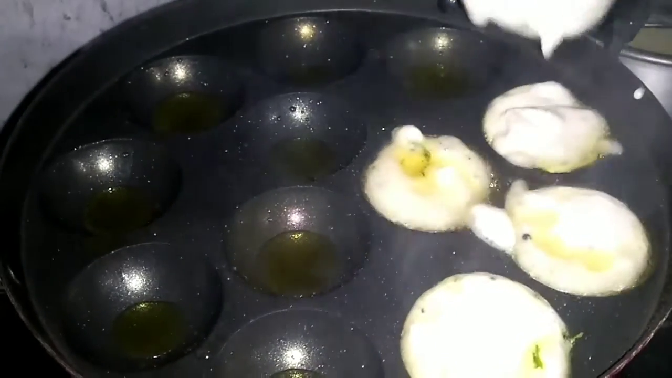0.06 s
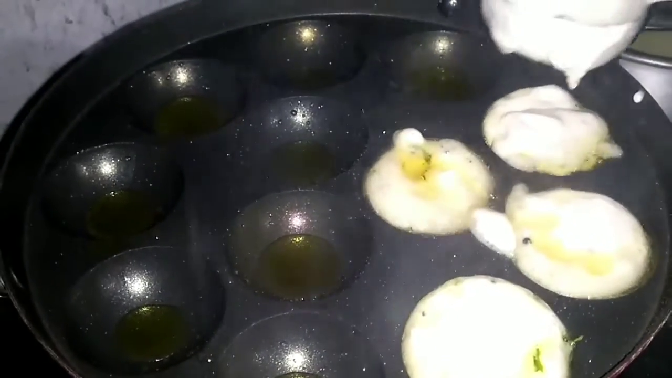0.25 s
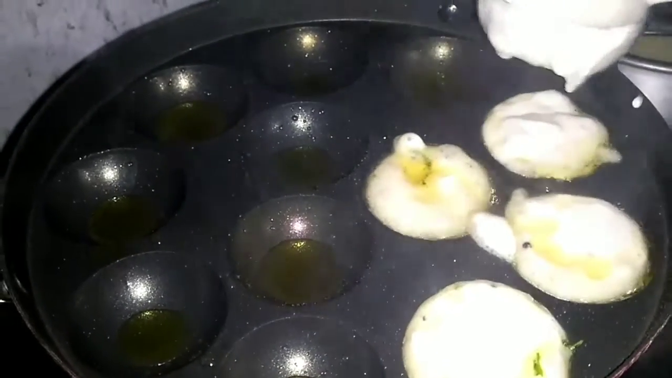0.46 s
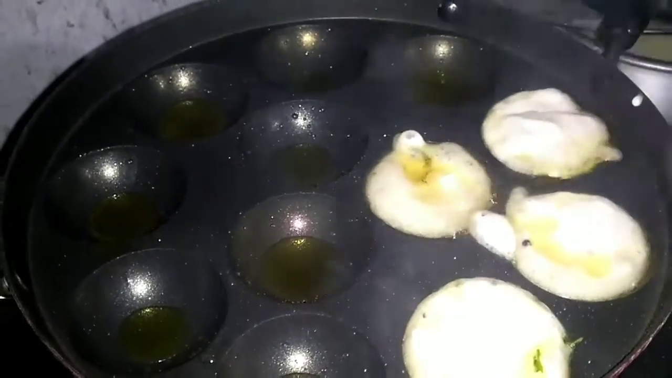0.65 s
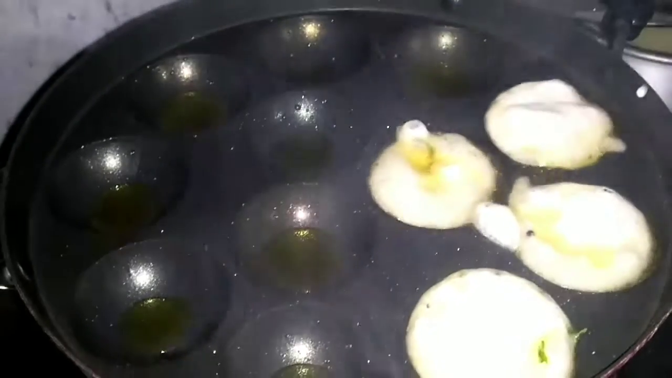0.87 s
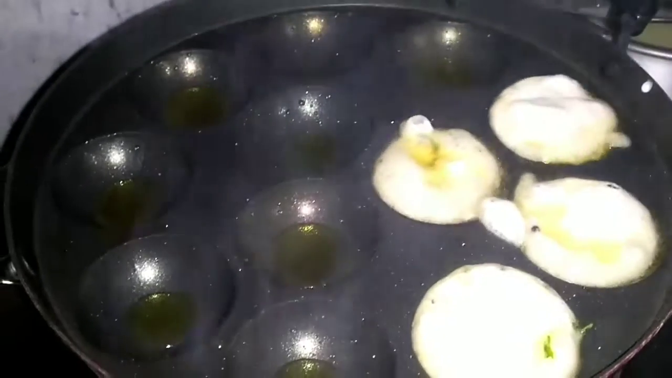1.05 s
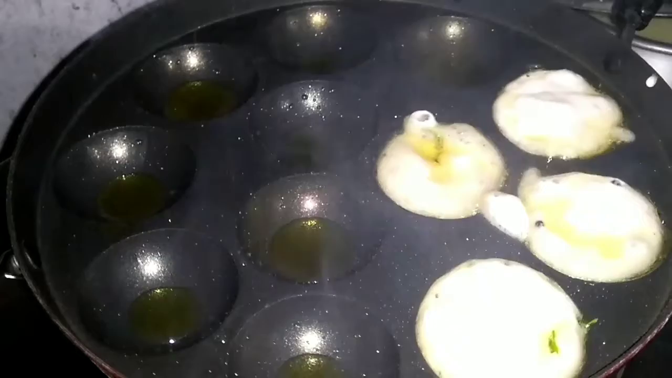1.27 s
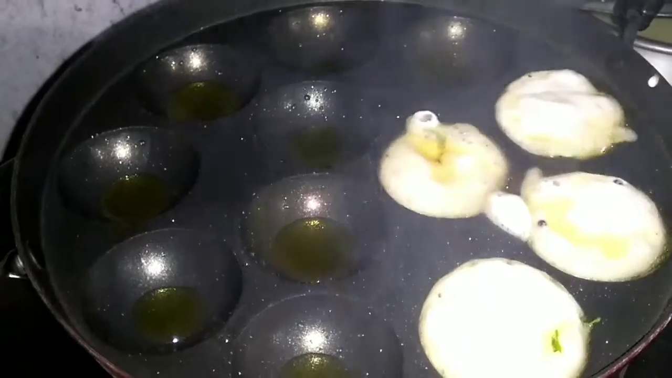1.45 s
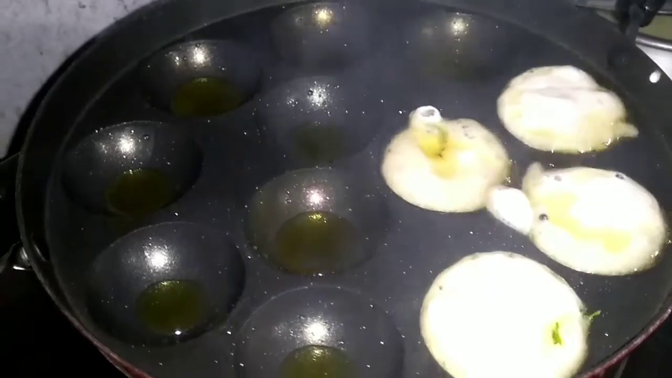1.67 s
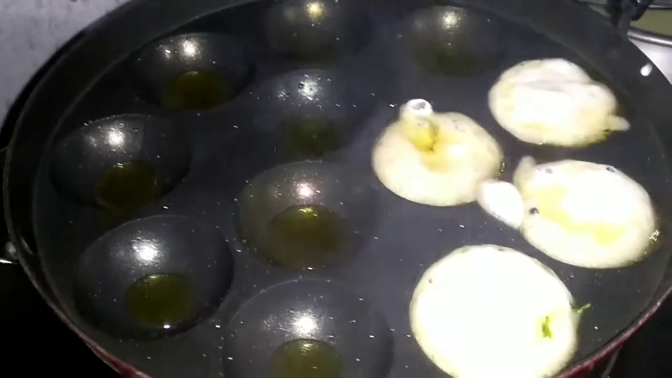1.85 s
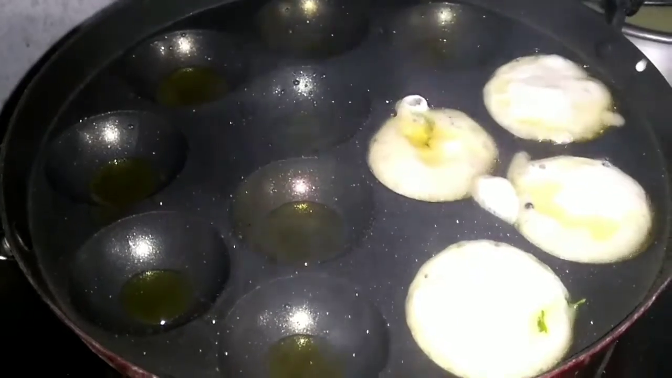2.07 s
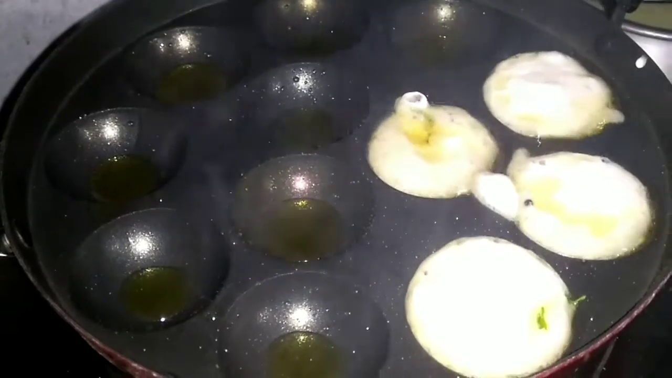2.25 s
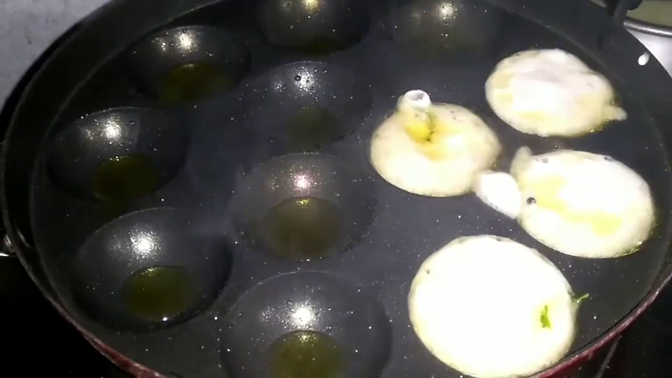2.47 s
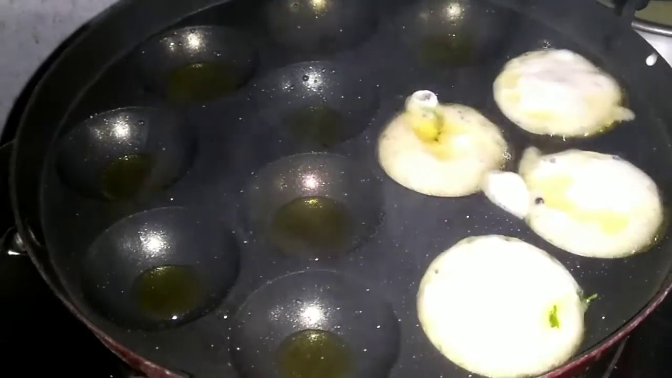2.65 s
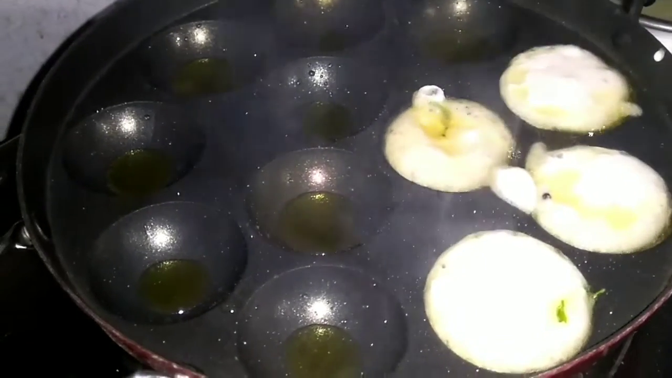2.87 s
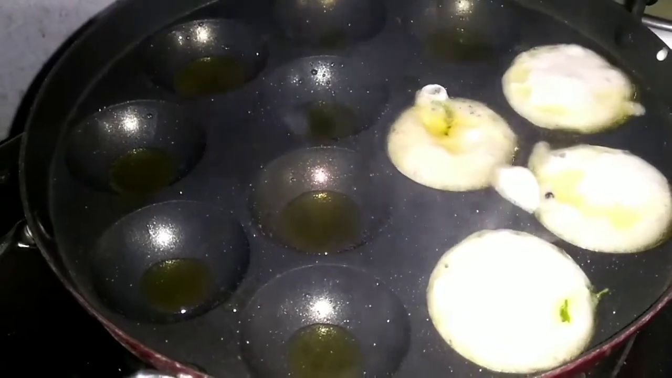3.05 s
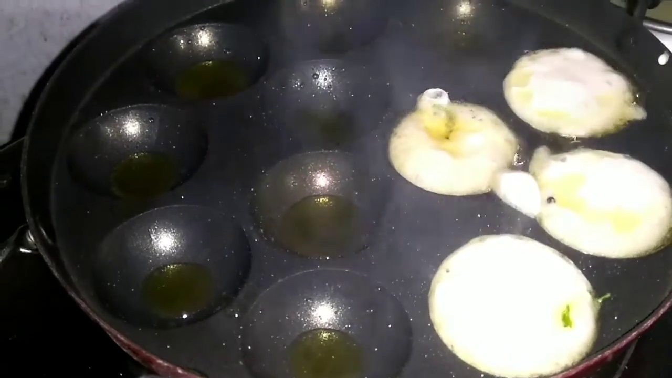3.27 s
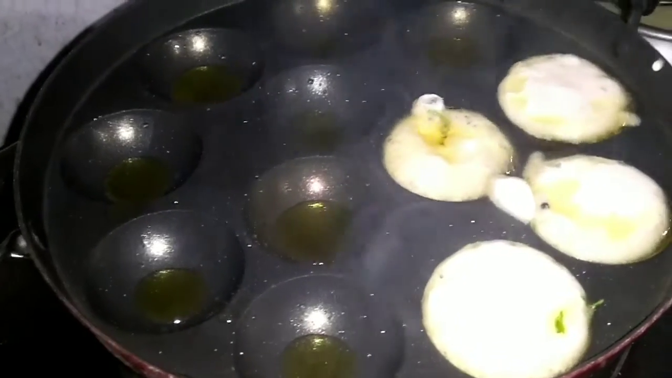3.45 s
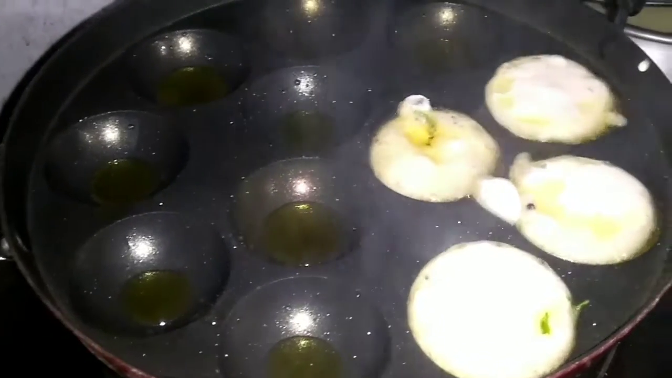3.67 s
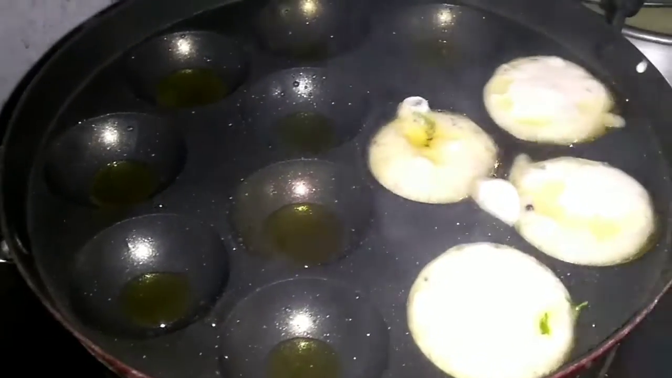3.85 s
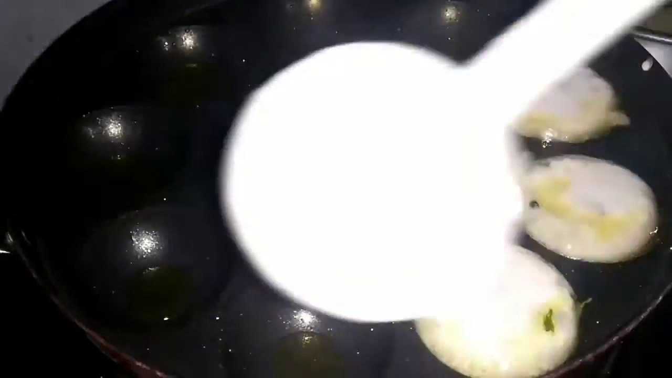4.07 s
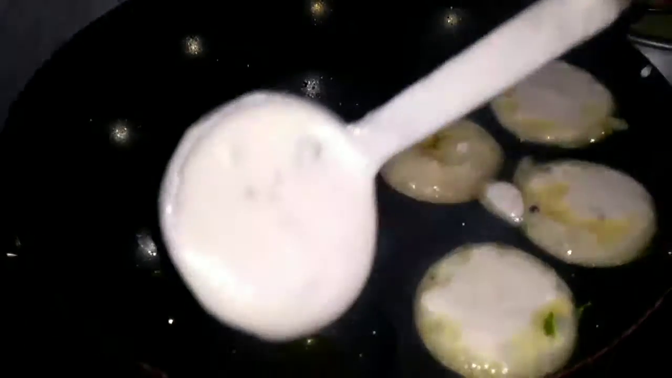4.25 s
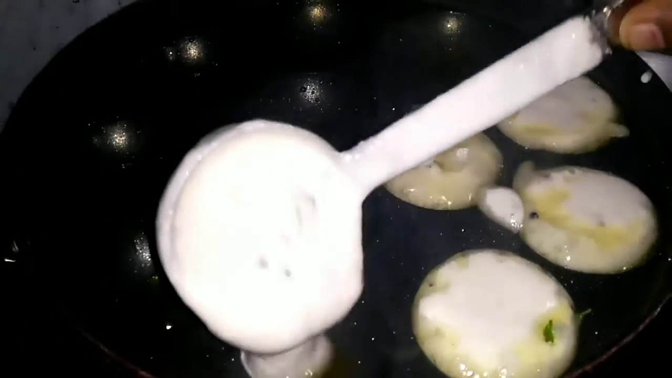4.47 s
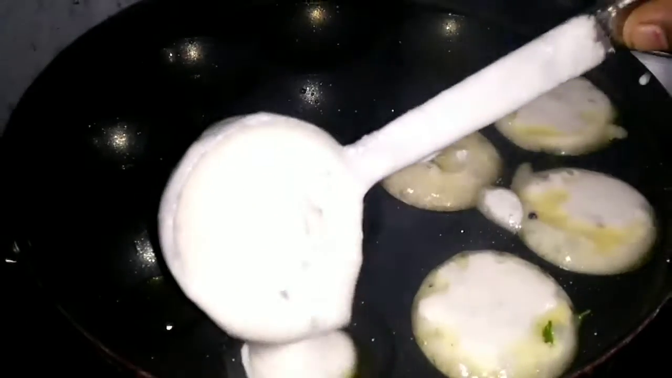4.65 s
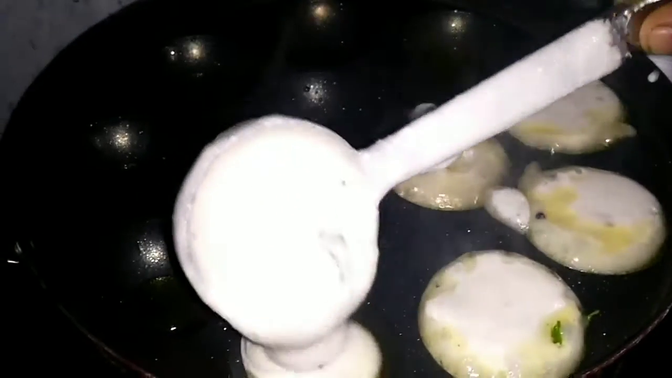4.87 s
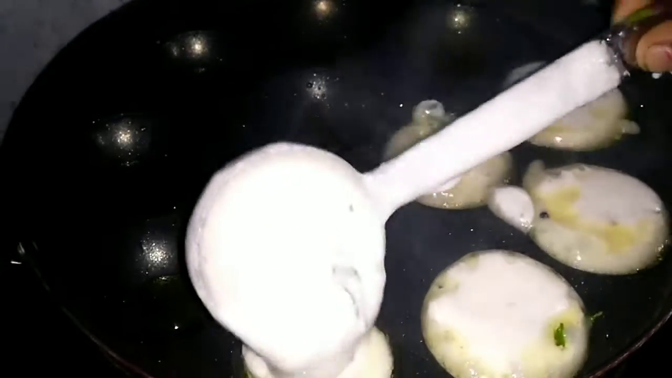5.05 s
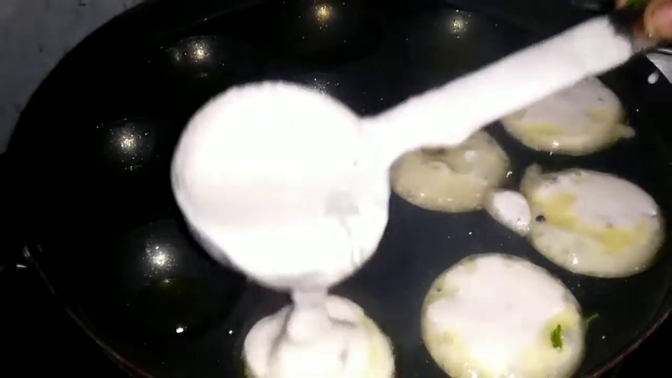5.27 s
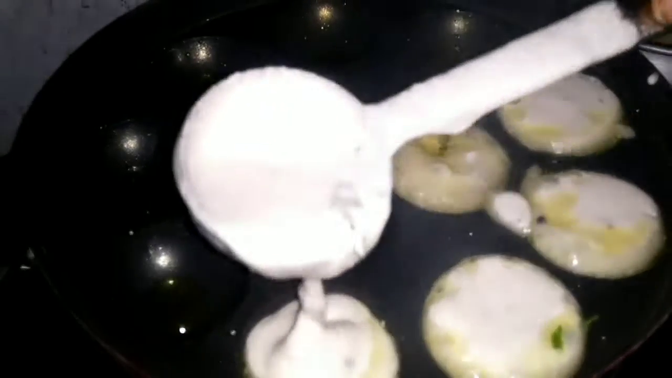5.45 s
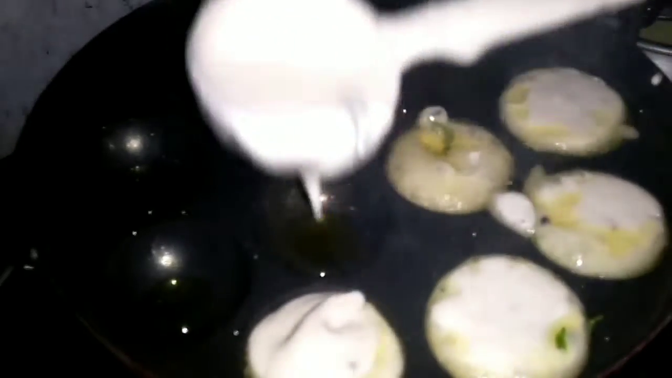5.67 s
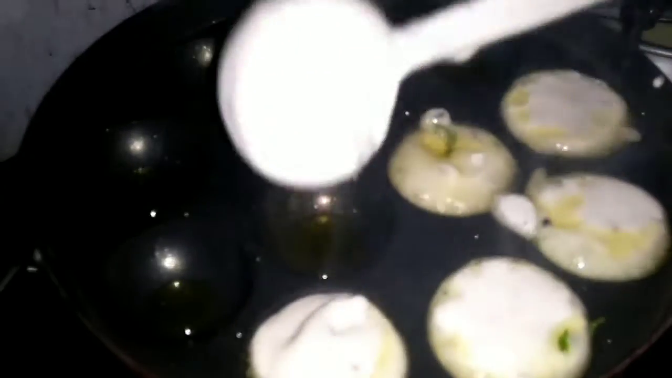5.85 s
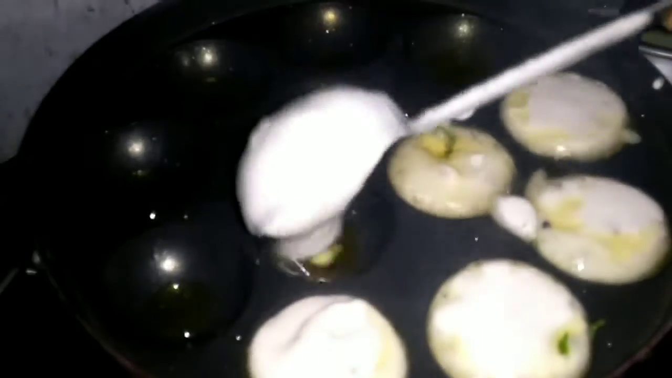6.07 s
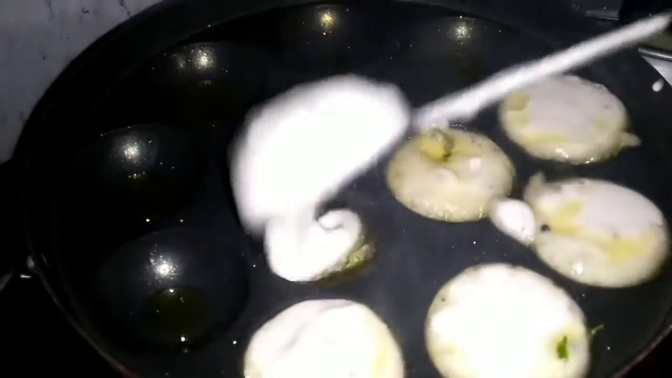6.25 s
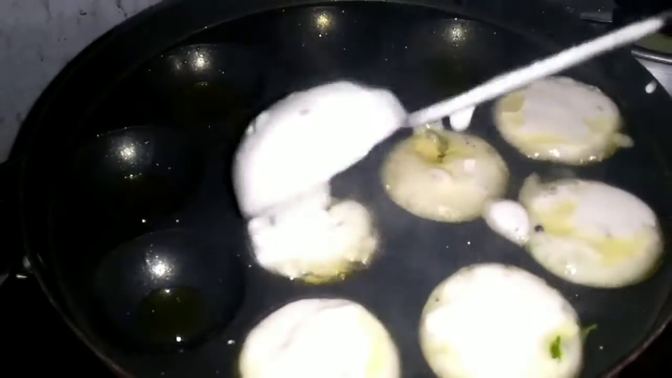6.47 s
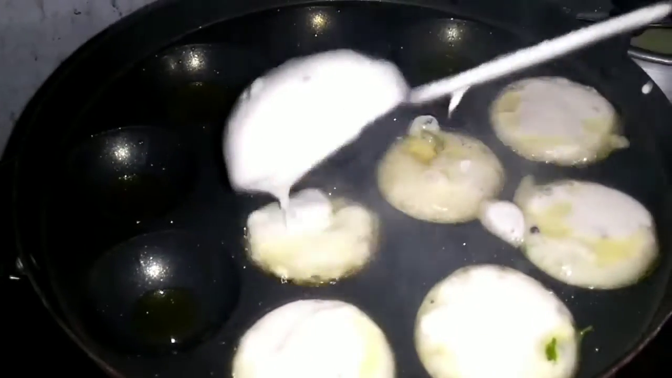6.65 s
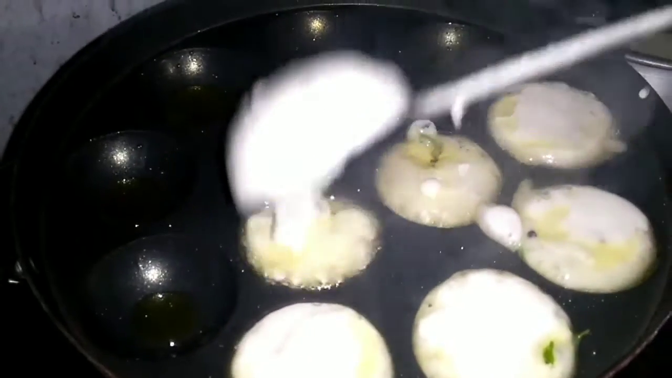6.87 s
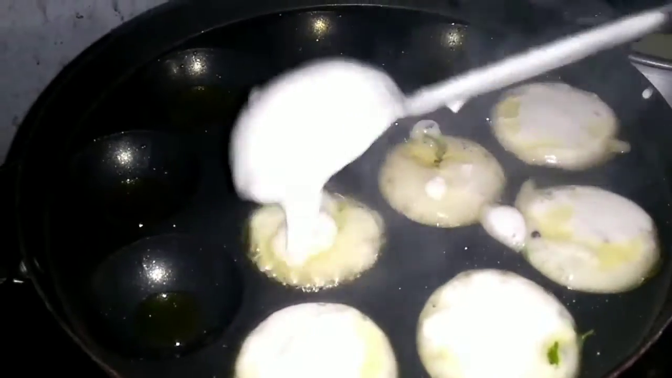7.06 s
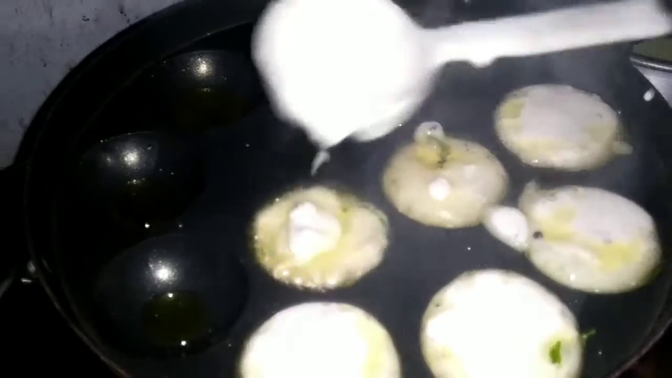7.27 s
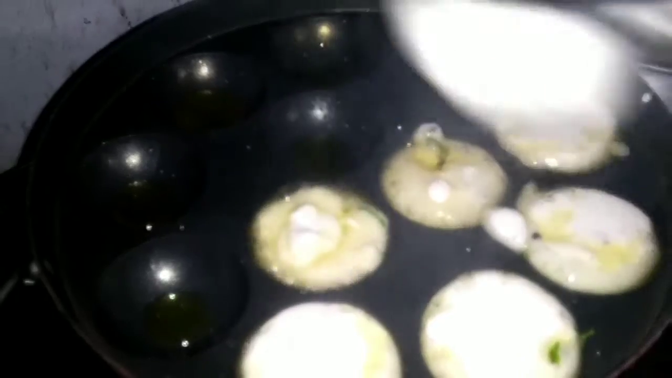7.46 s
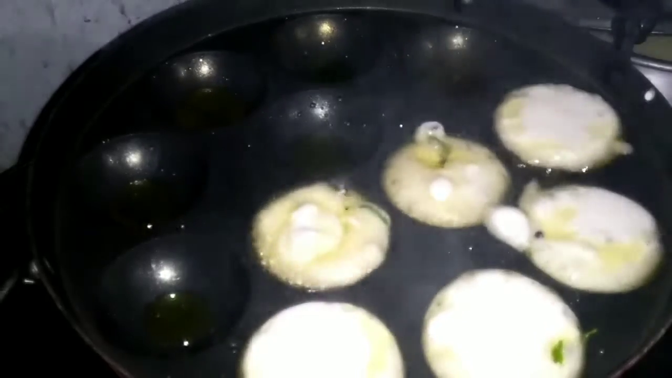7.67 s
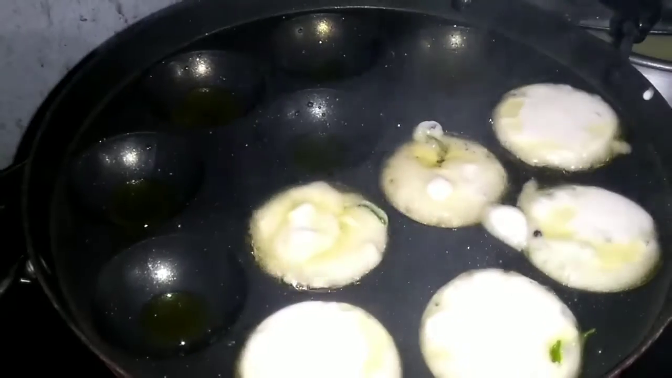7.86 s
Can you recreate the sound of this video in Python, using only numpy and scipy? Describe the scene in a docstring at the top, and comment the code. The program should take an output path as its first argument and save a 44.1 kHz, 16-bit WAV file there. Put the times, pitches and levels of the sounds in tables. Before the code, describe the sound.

Batter fries with a faint, fizzing hiss in the oiled cups of a pan, broken by little steam spurts and sharp oil spits. A ladle softly scrapes and bumps in a batter bowl, then knocks twice more clearly. Near the end a fresh spoonful meets the oil in a loud, bright, crackling sizzle that drops back after about a second. The microphone is close to the stove, with a faint low kitchen hum underneath.

```python
"""A fizzing, seething hiss comes first: batter fries in the oiled cups of a pan, and countless steam
bubbles burst. Steam pockets spurt, oil droplets spit, a drop plinks in an empty cup, and a fresh
spoonful roars up. Beside the stove a ladle scrapes and knocks in the batter bowl, exciting its modes
by friction and by impact. Soft bumps travel through the counter, and burner and room hum underneath."""
import sys
import numpy as np
from scipy import signal
from scipy.fft import rfft, irfft, next_fast_len
from scipy.io import wavfile
from scipy.ndimage import uniform_filter1d, map_coordinates

SR = 44100
rng = np.random.default_rng(int(sys.argv[2]) if len(sys.argv) > 2 else 0)


def waveform_to_disk(signal):
    """Save audio, clipped to [-1, 1], as 16-bit WAV at the path in sys.argv[1]."""
    frames = np.transpose(np.atleast_2d(signal))
    scaled = np.clip(frames, -1, 1) * 32767
    samples = np.round(scaled).astype(np.int16)
    wavfile.write(sys.argv[1], SR, samples)


N = 349272

# spectrum of fine bubbles and oil spits: f/Hz, relative spectral level/dB
FIZZ_SPECTRUM = [(3530, -57), (6000, -15.5), (6810, -26), (8230, -1.5), (10400, 2), (13400, -4),
                 (14400, -2), (15200, -5), (16000, -5.5)]
# modes of the batter bowl: f/Hz, relative level/dB, t60/s
BOWL_MODES = [(160, -8, .1), (225, -5, .1), (277, 0, .1), (345, -6, .1), (465, -6, .09), (552, -8, .09),
              (641, -12, .14), (716, -3, .2), (812, 0, .2), (915, -3, .2), (1008, -1, .2), (1068, -9, .14),
              (1148, -12, .1), (1270, -11, .1), (1530, -6, .12), (1780, -14, .07), (2022, -3, .14),
              (2280, -12, .08)]
PAN_LAG = 11  # samples by which the pan's sound reaches the left microphone port later


def amp(db):
    return 10 ** (np.asarray(db) / 20)


def unit_rms(x):
    return x / np.sqrt(np.mean(x ** 2) + 1e-20)


def over_pitch(points, hz):
    """Interpolation of (f/Hz, value) points on a logarithmic axis."""
    f, values = np.transpose(points)
    return np.interp(np.log(hz + 1), np.log(f + 1), values)


def over_time(rows):
    """Interpolation of (t/s, values...) rows to one curve per value column."""
    times, *columns = np.transpose(rows)
    return [np.interp(np.arange(N) / SR, times, column) for column in columns]


def wobble(rate):
    """A smooth random curve with `rate` knots a second."""
    return map_coordinates(rng.standard_normal(int(N * rate / SR) + 4), [np.arange(N) * rate / SR])


def filtered(x, response):
    """Linear filtering: the spectrum is multiplied by a frequency response."""
    n = x.shape[-1]
    size = next_fast_len(n + 8192)
    return irfft(rfft(x, size) * response(np.fft.rfftfreq(size, 1 / SR)), size)[..., :n]


def resonance(hz, centre, width):
    """Response of a damped oscillator, unity at its natural frequency."""
    return 1j * hz * width / (centre ** 2 - hz ** 2 + 1j * hz * width)


def sides(balance_db):
    """Level difference: left and right gains of an off-centre source."""
    return unit_rms(amp([[balance_db / 2], [-balance_db / 2]]))


def stereo_noise(n, direct):
    """Partial coherence: a direct share of the power reaches the left late; the rest is scattered."""
    straight, *scattered = rng.standard_normal((3, n))
    coherent = np.array([np.roll(straight, PAN_LAG), straight])
    return np.sqrt(direct) * coherent + np.sqrt(1 - direct) * np.array(scattered)


def flicker(x, depth_db):
    """Random modulation: the gain wanders in patches of frequency and time."""
    spectra = signal.stft(x, nperseg=256)[2]
    field = uniform_filter1d(rng.standard_normal(spectra.shape[1:]), size=8, axis=0)
    field = unit_rms(uniform_filter1d(field, size=8, axis=1))
    return signal.istft(spectra * amp(depth_db * field), nperseg=256)[1][:, :N]


def bubbles(n, count, cycles, spread_db, stray_samples):
    """Bursting bubbles ring as damped oscillators, each with its own path to the two ports."""
    pitch, when = rng.random((count, 2)).T[:, :, None]
    path, side, strength = np.clip(rng.standard_normal((count, 3)), -2.35, 2.35).T[:, :, None]
    hz, age = 800 + 16000 * pitch, np.arange(48)
    turns = hz * age / SR
    pops = amp(spread_db * strength) * np.sin(2 * np.pi * turns) * np.exp(-turns / cycles) * np.sqrt(hz)
    start = when * n + 64
    lag = np.clip(PAN_LAG + stray_samples * path, -60, 60)
    pair = []
    for onset, gain in (start + lag, amp(0.77 * side)), (start, amp(-1.5 * side)):
        at = onset.astype(int) + age
        pair.append(np.bincount(at.ravel(), (gain * pops).ravel(), n + 256)[64:n + 64])
    return unit_rms(np.array(pair))


def boil_levels():
    """Incoherent sources add in power: fizz and seethe, in dB, of simmering cups plus fresh pours."""
    # cups already frying: t/s, fizz of fine bubbles/dB, seethe of larger bubbles/dB
    simmer = [(0.0, -44.5, -48.5), (0.9, -49, -52.5), (1.2, -47.5, -49.5), (1.42, -48.5, -48.5),
              (1.55, -51.5, -54.5), (1.98, -48, -48), (2.3, -54, -56), (2.6, -49.5, -53),
              (2.77, -53.5, -45.5), (2.83, -56.5, -55.5), (3.6, -53.5, -56), (4.1, -58, -59.5),
              (4.9, -52.5, -50.5), (5.5, -54, -50), (6.0, -54, -55), (7.3, -44.5, -44), (7.55, -44, -49),
              (7.92, -47, -48.5)]
    # batter meets hot oil: t at full boil/s, t when batter covers the oil/s, fizz/dB, seethe/dB
    pours = [(4.497, 5.2, -59, -48.5), (6.243, 7.24, -23, -31.5)]
    fizz_rise, fizz_smother = 175, 178  # dB/s
    seethe_rise, seethe_sag, seethe_smother = 66, 21, 132  # dB/s
    hold_s, lead_s = 0.63, 0.046  # large bubbles come first and thin out first
    t = np.arange(N) / SR
    fizz, seethe = amp(over_time(simmer)) ** 2
    for full, covered, fizz_db, seethe_db in pours:
        early, late = np.maximum(full - t, 0), np.maximum(t - covered, 0)
        fizz += amp(fizz_db - fizz_rise * early - fizz_smother * late) ** 2
        sag_db = 1.5 * np.clip((t - full) / hold_s, 0, 1) + seethe_sag * np.maximum(t - full - hold_s, 0)
        smother_db = seethe_smother * np.maximum(t - covered + lead_s, 0)
        seethe += amp(seethe_db - seethe_rise * early - sag_db - smother_db) ** 2
    return 10 * np.log10(fizz), 10 * np.log10(seethe)


def frying():
    """Superposition: countless bubbles merge into a hiss, and the nearer ones stand out of it."""
    # upper seethe as batter spreads, drops in and settles: t/s, width/s, gain/dB
    surges = [(6.36, 0.067, 3), (6.72, 0.15, 5.5), (7.42, 0.056, -0.5)]
    t = np.arange(N) / SR
    fizz_db, seethe_db = boil_levels()
    bright_db = -6.5 + 0.92 * (fizz_db - seethe_db)  # brighter the more the fizz leads
    bright_db += sum(db * np.exp(-((t - s) / width) ** 2) for s, width, db in surges)
    unrest = np.clip((-15 - fizz_db) / 35, .55, 1)  # more bubbles add up more evenly
    boil = wobble(12)
    fine = stereo_noise(N, direct=0.25)
    fine += 0.62 * unrest * bubbles(N, count=12000, cycles=0.77, spread_db=9.5, stray_samples=3)
    large = stereo_noise(N, direct=0.35)
    large += 0.36 * unrest * bubbles(N, count=7000, cycles=1.2, spread_db=7.5, stray_samples=4)
    fizz = unit_rms(filtered(flicker(fine, depth_db=1.58), lambda hz: amp(over_pitch(FIZZ_SPECTRUM, hz))))
    # larger bubbles: f/Hz, relative spectral level/dB
    seethe_spectrum = [(290, -61), (500, -18.5), (796, -13), (881, -25), (1130, -8.5), (1500, -9),
                       (1800, -4.5), (4450, -0.5), (6700, 0), (7500, 0.5), (9750, -9.5), (16500, -120)]
    pan_reflection = lambda hz: 1 + .4 * np.exp(-2j * np.pi * hz * .00649)
    colour = lambda hz: amp(over_pitch(seethe_spectrum, hz)) * pan_reflection(hz)
    seethe = unit_rms(filtered(flicker(large, depth_db=1.95), colour))
    pan_ring = lambda hz: 1 + amp(2.5) * resonance(hz, centre=1030, width=66)
    seethe = filtered(seethe, pan_ring)
    upper = filtered(seethe, lambda hz: 1 / (1 + (4200 / (hz + 1)) ** 4))
    seethe += (amp(bright_db) - 1) * upper
    fizz_db += unrest * (0.9 * boil + 1.2 * wobble(60))
    seethe_db += unrest * (boil + 0.8 * wobble(25))
    return amp(fizz_db) * fizz + amp(seethe_db) * seethe


def kitchen_hum():
    """Burner and room make a low rush whose long waves reach both ports nearly in phase."""
    # the rush: f/Hz, relative spectral level/dB
    spectrum = [(18, -53), (30, 1), (135, 9), (188, -2.5), (217, -2.5), (312, 7.5), (373, -3), (485, 3.5),
                (600, -1.5), (651, 1.5), (930, -6.5), (1060, 3.5), (1200, -25), (1500, -50), (1950, -23),
                (3300, -120)]
    # its course: t/s, level/dB, gain below 200 Hz/dB
    levels = [(0.0, -64.5, 1), (1.5, -67.5, 4.5), (3.0, -67.5, 3), (4.3, -69, 6), (4.9, -68.5, 6),
              (6.0, -61, -3.5), (7.92, -62, -1.5)]
    # likeness of left and right: f/Hz, correlation
    coherence = [(60, 0.98), (300, 0.93), (700, 0.7), (1500, 0.67)]
    angle = lambda hz: np.arccos(over_pitch(coherence, hz)) / 2
    colour = lambda hz: amp(over_pitch(spectrum, hz)) * [np.cos(angle(hz)), np.sin(angle(hz))]
    mid, side = filtered(flicker(rng.standard_normal((2, N)), depth_db=1), colour)
    rush = unit_rms(np.array([mid + side, mid - side]))
    bass = filtered(rush, lambda hz: 1 / (1 + (hz / 200) ** 6))
    db, bass_db = over_time(levels)
    return amp(db) * (rush + (amp(bass_db) - 1) * bass)


def ladle_scrapes():
    """Forced vibration: rough friction drives the bowl's lower modes, which wet batter damps."""
    # strokes: t of most pressure/s, level/dB, fade time/s, f favoured by the rubbed spot/Hz
    strokes = [(0.044, -55.5, 0.037, 297), (0.25, -66, 0.07, 740), (0.95, -65, 0.15, 480),
               (1.745, -56, 0.038, 350), (1.80, -52, 0.042, 594), (1.82, -55.5, 0.57, 308),
               (1.85, -58, 0.22, 554), (1.976, -49, 0.13, 570), (2.118, -55, 0.12, 500),
               (2.502, -57.5, 0.079, 577), (2.589, -52.5, 0.24, 415), (2.69, -62, 0.18, 664),
               (2.855, -63, 0.031, 503), (3.45, -61.5, 0.044, 487), (4.03, -61.5, 0.11, 540),
               (4.1, -61, 0.11, 280), (4.281, -62, 0.063, 560), (4.434, -61, 0.54, 865),
               (4.64, -59, 0.34, 630), (4.86, -59, 1, 507), (4.949, -36, 0.12, 273),
               (4.96, -36.5, 0.086, 825), (5.075, -53, 0.05, 490), (5.196, -39, 0.099, 306),
               (5.212, -40.5, 0.13, 726), (5.28, -43, 0.15, 366), (5.49, -62.5, 0.41, 497),
               (5.85, -61, 0.1, 480), (6.99, -57.5, 0.15, 358)]
    press_db_per_s, fade_db, spot_db_per_octave2 = 583, 25.5, 145
    hz, level, t60 = np.transpose([mode for mode in BOWL_MODES if mode[0] < 1200])[:, :, None]
    width = 3 * np.log(1000) / (np.pi * np.minimum(t60, .12))
    friction = rng.standard_normal(N) * amp(2.5 * wobble(45))
    modes = filtered(friction, lambda f: amp(level) * resonance(f, hz, width))
    out, t = np.zeros(N), np.arange(SR) / SR - .1  # t = 0 at most pressure
    for s, db, fade_s, spot_hz in strokes:
        pressure = amp(db - np.maximum(-press_db_per_s * t, fade_db * t / fade_s))
        weights = amp(-spot_db_per_octave2 * np.log2(hz[:, 0] / spot_hz) ** 2)
        at = np.clip(round(s * SR) + np.round(t * SR).astype(int), 0, N - 1)
        out[at] += pressure * unit_rms(weights @ modes[:, at])
    return out


def steam_spurts():
    """Jet noise: a steam pocket vents through the oil; its width sets the pitch, the cup adds body."""
    # pockets: t/s, level/dB, f/Hz, time to fall 60 dB/s, relative body/dB, left minus right/dB
    pockets = [(0.473, -62, 9800, .11, -22, 0), (0.594, -48.5, 9900, 0.11, -2, 0),
               (0.716, -63.5, 3900, 0.15, 17, -12), (0.803, -59, 3900, 0.16, 3, 11),
               (1.048, -43, 9850, 0.19, -9, -2), (1.249, -43, 9700, 0.13, -15, -1),
               (1.671, -49.5, 8450, 0.079, -7, 3), (1.835, -54.5, 2350, 0.21, 0, 6),
               (2.16, -53, 9000, 0.089, -1.5, -1), (2.312, -61, 4550, 0.12, 5, 5),
               (2.346, -64.5, 2650, 0.088, 11, 10), (2.412, -38, 10500, 0.15, -8, -23),
               (2.44, -37, 10600, 0.042, -14, -17), (2.445, -45.5, 2950, 0.028, 0, 11),
               (2.598, -61, 10500, 0.068, -19, 0), (2.917, -53, 4450, 0.11, -6, 12),
               (2.932, -48, 3300, 0.041, -16, 6), (3.037, -47, 6240, 0.11, -12, -1),
               (3.275, -36, 14500, 0.037, -17, -13), (3.394, -70.5, 2920, 0.22, 20.5, 6),
               (3.46, -48, 12500, 0.053, -18, 2), (3.519, -48.5, 8500, 0.16, -4.5, 2),
               (3.704, -53.5, 4200, 0.14, 2, 12), (3.827, -49, 8000, 0.092, -1.5, -4),
               (3.895, -47.5, 4630, 0.091, -5, 6), (3.937, -49.5, 12900, 0.11, -16, 3),
               (4.172, -36, 12900, 0.044, -27, -7), (4.214, -45.5, 12600, 0.067, -28, 0),
               (4.229, -49.5, 5800, 0.074, -5, 3), (4.285, -59, 11800, .1, -23, 0),
               (4.334, -52, 12500, 0.061, -25, 0), (4.368, -52.5, 4830, 0.24, -1.5, 3),
               (4.52, -48, 14900, 0.18, -2.5, -13), (4.588, -51.5, 3040, 0.16, -7, 7),
               (4.641, -47, 2850, 0.16, -22, 5), (4.783, -49.5, 2360, 0.07, -4, -4),
               (4.926, -43.5, 1980, 0.19, 6, 13), (4.988, -33, 11500, 0.16, -9.5, 1.5),
               (5.014, -54, 13000, 0.37, 11.5, 4), (5.184, -56, 3150, 0.18, 13, 4),
               (5.518, -47.5, 5800, 0.12, -25, 5), (5.74, -58, 4300, 0.074, -13, 2),
               (5.846, -52, 2960, 0.14, -29, 2), (5.97, -42.5, 13600, 0.14, -1, -14),
               (6.06, -50.5, 2040, 0.17, 6, -12), (6.109, -38.5, 11000, 0.049, -10, -12),
               (6.15, -35.5, 4100, 0.1, -5, 3), (6.22, -46, 10500, 0.19, -3, -4),
               (6.283, -22.5, 9200, 0.062, -12, 3), (6.606, -44, 3230, 0.14, 6.5, 0),
               (6.797, -39.5, 1980, 0.069, 3.5, -3), (7.197, -59, 4020, 0.077, -5, 0)]
    out, n = np.zeros((2, N + SR)), SR // 5
    t = np.arange(n) / SR

    def band(x, centre_hz, octaves):
        return unit_rms(filtered(x, lambda hz: amp(-6 * (np.log2((hz + 1) / centre_hz) / octaves) ** 2)))

    for s, db, pitch_hz, length, body_db, balance_db in pockets:
        opening = 1 - np.exp(-t / max(.0015, .2 * (length - .15)))  # long spurts open slowly
        collapse = amp(db - 60 * (t / length) ** 1.9)
        jet = stereo_noise(n, direct=0.1)
        jet += 0.45 * bubbles(n, count=250, cycles=3, spread_db=6, stray_samples=3.2)
        mouth = sides(balance_db) * band(jet, pitch_hz, octaves=0.44)
        cup = amp(body_db) * band(jet, 3100, octaves=1.17)
        out[:, round(s * SR):][:, :n] += opening * collapse * (mouth + cup)
    return out[:, :N]


def ladle_knocks():
    """Free vibration: a blow sets the bowl's modes ringing until the batter chokes them."""
    # blows: t/s, peak level/dB, gain at 600-1200 Hz/dB, gain above 1200 Hz/dB,
    # f favoured by the struck spot/Hz, time until choked/s
    blows = [(0.904, -30.5, -35, -40, 261, 0.032), (1.687, -34, -36, -40, 295, 0.05),
             (1.719, -30, -43, -42, 293, 0.0084), (1.74, -49, -40, -40, 300, .015),
             (1.796, -42, -21, -32, 269, 0.022), (1.967, -52, 8, 0, 560, 0.015),
             (2.01, -52, 6, 0, 500, 0.021), (2.112, -46, -32, -40, 326, 0.035),
             (2.537, -27, -34, -24, 360, 0.0094), (2.569, -39, -40, -40, 222, 0.026),
             (2.605, -36, -40, -40, 300, 0.048), (2.658, -47, -38, -40, 228, 0.023),
             (4.067, -47, -37, -40, 283, 0.047), (4.15, -54.5, -56, -56, 283, 0.027),
             (4.924, -16.5, 2.5, 4.5, 274, 0.017), (5.170, -20.5, 6, 6.5, 298, 0.02),
             (5.248, -28.5, 0, 0, 325, 0.011), (5.324, -42.5, -32, -40, 307, 0.041),
             (7.885, -43, -31, -35, 210, 0.029)]
    spot_db_per_octave2, rise_cycles, choked_share = 16.5, 0.74, 0.06
    out, t = np.zeros(N + SR), np.arange(SR // 4) / SR
    hz, level, t60 = np.transpose(BOWL_MODES)[:, :, None]
    for s, db, mid_db, high_db, spot_hz, choke_s in blows:
        low_db = -spot_db_per_octave2 * np.log2(hz / spot_hz) ** 2
        tilt_db = np.where(hz > 1200, high_db, np.where(hz > 600, mid_db, low_db))
        slosh = uniform_filter1d(rng.standard_normal((len(hz), len(t))), size=300)  # blurs each mode
        scatter_db = rng.normal(0, 1.5, hz.shape) + 1.5 * unit_rms(slosh)
        decay = amp(level + tilt_db + scatter_db - 60 * t / t60)
        rise = 1 - np.exp(-t * hz / rise_cycles)
        tones = np.sin(2 * np.pi * (hz * t + 0.32 * rng.random(hz.shape)))
        choke = choked_share + (1 - choked_share) / (1 + (t / choke_s) ** 8)
        ring = (rise * decay * tones).sum(axis=0) * choke
        out[round(s * SR):][:len(t)] += amp(db) * ring / np.abs(ring).max()
    return out[:N]


def oil_spits():
    """Impulsive source: a droplet bursts with a bright click and a brief echo round the cup."""
    # droplets: t/s, level/dB, left minus right/dB
    droplets = [(1.055, -29, -3), (1.244, -26, -1), (1.6706, -28, 1), (2.4104, -26, -12),
                (2.4184, -22, -14), (2.4219, -10.5, -11), (2.4436, -12, -16), (2.4514, -24, -12),
                (2.4544, -14, -10), (2.477, -18, -14), (3.0081, -36, -1), (3.0435, -23, 2),
                (3.273, -29, -4), (3.2784, -30, -9), (3.284, -32, -6), (3.465, -30, 1), (3.5109, -35, 0),
                (3.6516, -49, 1), (3.708, -26, 1), (3.8312, -32, -1), (3.897, -40, 2), (3.9414, -25, 0),
                (4.171, -29, -10), (4.178, -32, -13), (4.189, -32, -4), (4.2148, -34, 1), (4.283, -31, 0),
                (4.337, -35, 0), (4.5341, -24, -1), (4.788, -30, -4), (4.9871, -18, 0), (5.8172, -25, -2),
                (5.9209, -31, -4), (5.967, -20, -17), (5.9726, -13, -21), (6.0561, -37, -2),
                (6.106, -27, -8), (6.123, -17, -8), (6.2437, -16, 0), (6.2844, -14, 0), (6.5104, -15, 0),
                (6.6142, -2, 2), (6.797, 0.5, 2), (6.848, -3, -4), (7.0025, -21, 0), (7.0874, -12, -1),
                (7.15, -5, -12), (7.173, -1, -5)]
    echo_db, echo_t60, tear_samples = -21, 0.023, 40
    out, t = np.zeros((2, N + SR)), np.arange(400) / SR
    bright = lambda hz: amp(over_pitch(FIZZ_SPECTRUM, hz)) / (1 + (6500 / (hz + 1)) ** 6)
    impulse_peak = np.abs(filtered(np.arange(512) == 256, bright)).max()
    for s, db, balance_db in droplets:
        start, gain = round(s * SR), amp(db) * sides(balance_db) / impulse_peak
        echo = amp(echo_db - 60 * t / echo_t60) * rng.standard_normal((2, len(t)))
        out[:, start:][:, :len(t)] += gain * echo
        tear = start + tear_samples  # the droplet's skin tears
        out[[0, 1], [tear + PAN_LAG, tear]] += gain[:, 0]
    return filtered(out[:, :N], bright)


def damped_tones(rows, rise_s):
    """Exponentially decaying sines with a soft start and a wavering level."""
    out, t = np.zeros(N + SR), np.arange(SR // 4) / SR
    for s, db, hz, t60 in rows:
        waver_db = 5 * unit_rms(uniform_filter1d(rng.standard_normal(len(t)), size=200))
        envelope = amp(db + waver_db - 60 * t / t60) * (1 - np.exp(-t / rise_s))
        out[round(s * SR):][:len(t)] += envelope * np.sin(2 * np.pi * hz * t)
    return out[:N]


def counter_bumps():
    """Structure-borne sound: soft low pushes travel through the counter."""
    # bumps: t/s, level/dB, f/Hz, t60/s
    bumps = [(1.75, -34, 56, 0.13), (1.782, -34, 54, 0.13), (1.815, -39, 60.7, 0.15),
             (2.065, -49, 75.4, 0.18)]
    return damped_tones(bumps, rise_s=0.019)


def batter_plinks():
    """Impact excitation: a drop of batter rings one mode of an empty cup."""
    # drops: t/s, level/dB, f/Hz, t60/s
    drops = [(3.9506, -44, 1100, 0.024), (5.995, -46.5, 1122, 0.26)]
    return damped_tones(drops, rise_s=0.0027)


def reverberation(x, t60):
    """Diffuse reflections from the walls form a short, dull tail, alike at both ports in the bass."""
    t = np.arange(SR // 3) / SR
    tail = rng.standard_normal((2, len(t))) * amp(-60 * t / t60) * (t > .004)
    colour = lambda hz: np.array([np.ones_like(hz), hz / (hz + 700)]) / (1 + (hz / 4000) ** 2)
    mid, side = filtered(tail, colour)
    tail = np.array([mid + side, mid - side])
    return signal.fftconvolve(x[None], tail / np.linalg.norm(tail[0]), axes=1)[:, :N]


def scene():
    """Sound pressures add; the bowl, like the pan, lies nearer the right port."""
    bowl = ladle_knocks() + ladle_scrapes()
    bowl_left = filtered(bowl, lambda hz: np.exp(-2j * np.pi * hz * 9 / SR))  # 9 samples later
    ladle = np.array([bowl_left, bowl]) + amp(-14) * reverberation(bowl, t60=0.13)
    pan = frying() + steam_spurts() + oil_spits()
    return pan + ladle + counter_bumps() + batter_plinks() + kitchen_hum()


def record(dry):
    """Microphone response: the ports differ in colour, dip near 7 kHz and lose deep bass and top treble."""
    # imbalance of the two ports: f/Hz, left minus right/dB
    imbalance = [(60, 0.0), (99, 0.0), (160, 1.5), (270, 1.5), (450, -2.0), (740, -1.5), (1220, -2.5),
                 (2010, 1.5), (3330, 5.0), (5500, 3.5), (9080, -2.5), (15000, -3.0)]
    top_hz = 15850
    colour = lambda hz: amp(np.array([[.5], [-.5]]) * over_pitch(imbalance, hz))
    dip = lambda hz: 1 - 0.78 / (1 + ((hz - 6880) / 250) ** 2)
    bass_cut = lambda hz: (1j * hz / (55 + 1j * hz)) ** 3
    coloured = filtered(dry, lambda hz: colour(hz) * dip(hz) * bass_cut(hz))
    return filtered(coloured, lambda hz: hz < top_hz)


dry = scene()
out = record(dry)
waveform_to_disk(out)
```